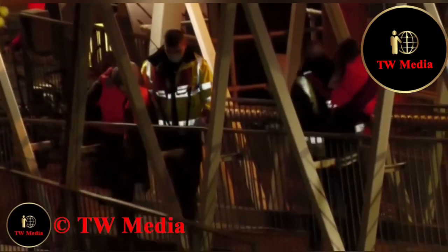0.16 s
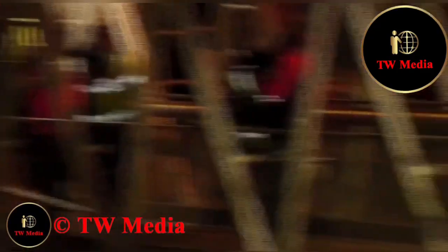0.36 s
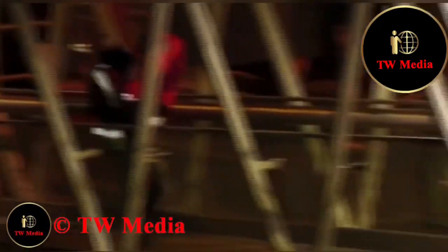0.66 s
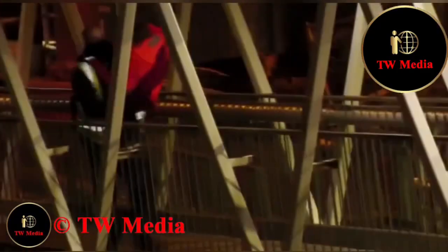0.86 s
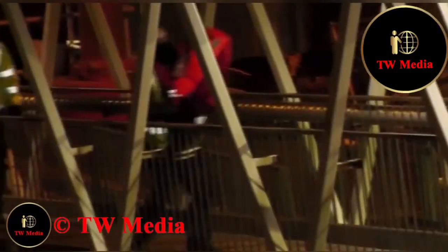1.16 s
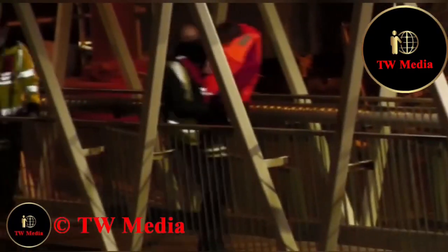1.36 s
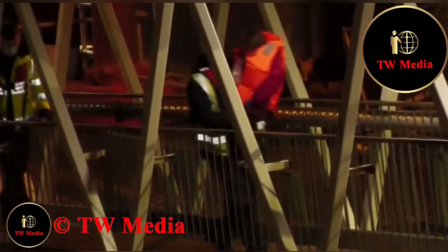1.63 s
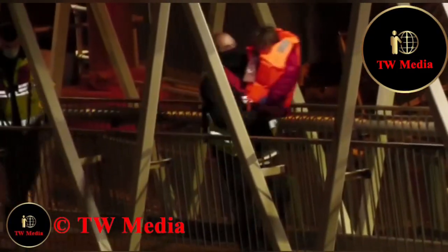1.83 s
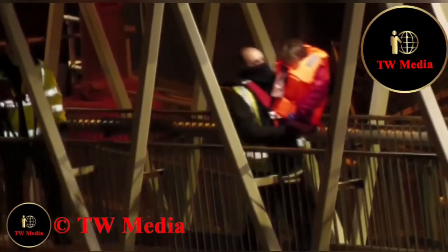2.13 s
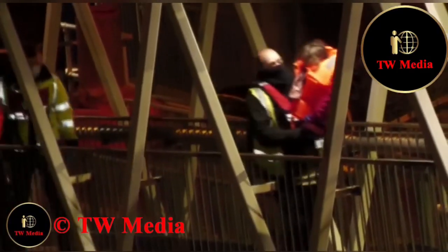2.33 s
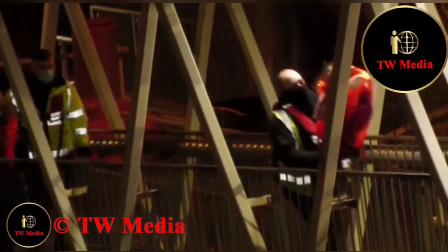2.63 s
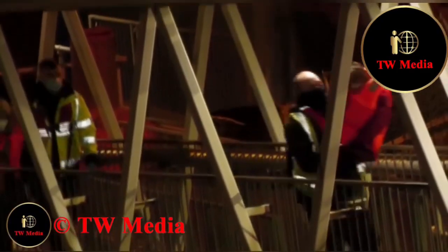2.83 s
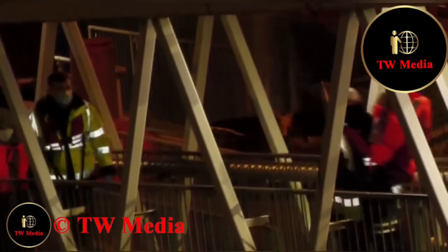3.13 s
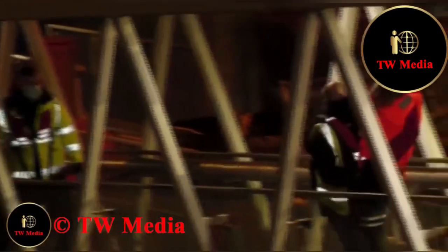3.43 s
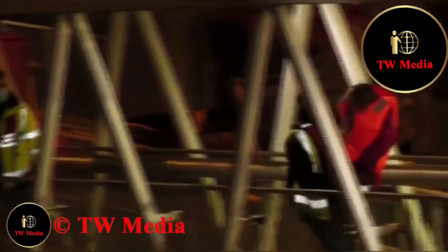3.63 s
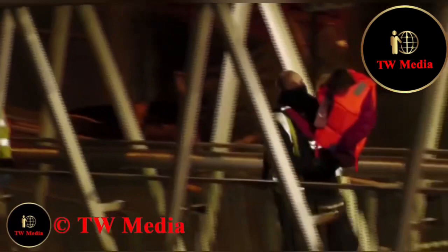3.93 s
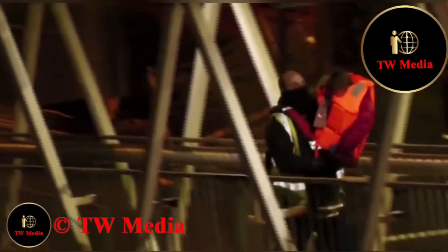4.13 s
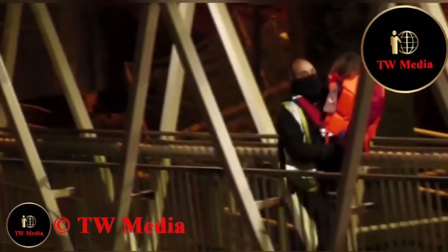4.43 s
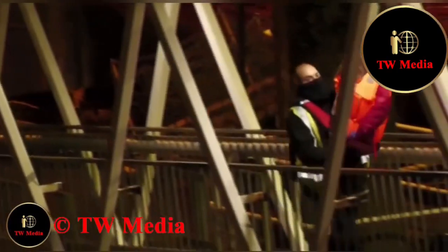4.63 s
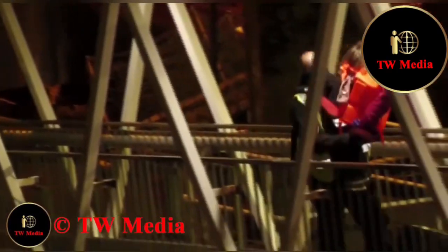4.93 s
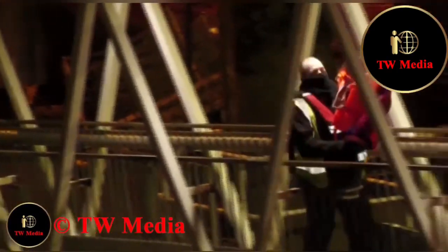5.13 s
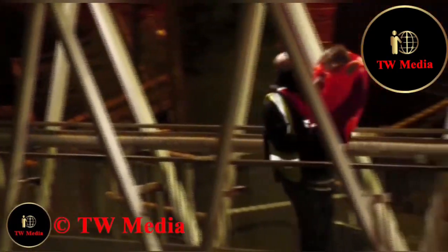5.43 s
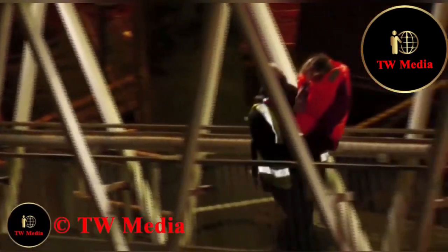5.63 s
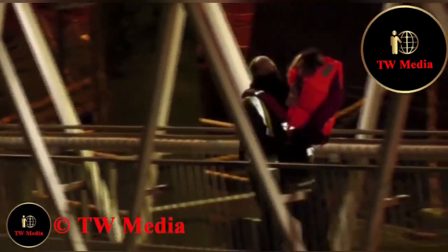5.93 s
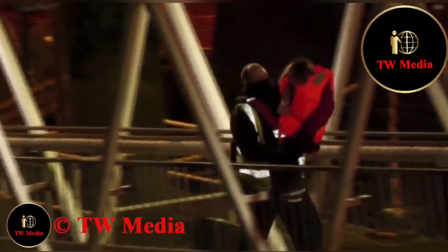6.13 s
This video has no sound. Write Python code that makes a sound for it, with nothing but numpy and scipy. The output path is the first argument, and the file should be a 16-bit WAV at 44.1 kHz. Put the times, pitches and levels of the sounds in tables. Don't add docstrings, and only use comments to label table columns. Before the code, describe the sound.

Steady rough idle of a big marine diesel, deep pulsing hum, metallic clatter and fan roar, with small high ticks from a loose fitting.

```python
import sys
import numpy as np
from scipy import signal
from scipy.fft import rfft, irfft, next_fast_len
from scipy.io import wavfile
from scipy.ndimage import uniform_filter1d, map_coordinates

SR = 44100
rng = np.random.default_rng(int(sys.argv[2]) if len(sys.argv) > 2 else 0)


def rack_gain(trim_db):
    fader = np.asarray(trim_db, float)
    return 10 ** (fader / 20)


def persist_wave(psi):
    counts = np.round(np.clip(psi, -1, 1) * 32767).astype(np.int16)
    wavfile.write(sys.argv[1], SR, np.atleast_2d(counts).T)


N = 276507
T = np.arange(N) / SR
THROB = 12

# (place in the cycle [0-1], knock level [dB], clatter level [dB])
CYLINDERS = [
    (.015, 5.5, 9),
    (0.168, 5, 8.5),
    (.36, 6, 9),
    (.51, 3, 7.5),
    (.68, 0, 7),
    (.85, 8.5, 7),
]


def unit(x):
    return x / np.sqrt(np.mean(x ** 2) + 1e-20)


def along(points, hz):
    f, v = np.transpose(points)
    return np.interp(np.log(hz + 1), np.log(f + 1), v)


def filtered(x, gain):
    m = next_fast_len(N + 8192)
    spectrum = rfft(x, m) * gain(np.fft.rfftfreq(m, 1 / SR))
    return irfft(spectrum, m)[..., :N]


def coloured(x, colour):
    return unit(filtered(x, lambda hz: rack_gain(along(colour, hz))))


def wobble(rate):
    knots = rng.standard_normal(200)
    coarse = map_coordinates(knots, [T[::64] * np.clip(rate, .1, 30)])
    return np.interp(T, T[::64], coarse)


def cycle():
    # (time [s], speed [cycles per s])
    idle_speed = [(0.0, 6.307), (0.3, 6.305), (0.55, 6.284), (1.0, 6.284), (2.0, 6.299), (2.55, 6.261),
                  (3.0, 6.282), (4.0, 6.269), (4.35, 6.312), (4.85, 6.274), (5.7, 6.247), (6.27, 6.251)]
    return np.cumsum(np.interp(T, *np.transpose(idle_speed))) / SR


def firings(place, jitter_s, scatter_db):
    turns = cycle()
    chance = rng.standard_normal((48, 2))
    known_turns = np.r_[-1, turns]
    known_samples = np.r_[-SR / 6.3, np.arange(N)]
    at = np.interp(np.arange(48) - 1 + place, known_turns, known_samples, right=2 * N)
    at = np.round(at + jitter_s * SR * chance[:, 0]).astype(int) + SR // 4
    keep = (at >= 0) & (at < N + SR // 4)
    return np.bincount(at[keep], rack_gain(scatter_db * chance[keep, 1]), N + SR // 4)


def roar():
    # (pitch [Hz], level [dB per Hz])
    roar_colour = [(15, -15), (40, 0), (75, -3), (110, -2.5), (170, 1.5), (240, -9.5), (400, -5.5),
                   (600, 1), (900, -9), (1200, -5), (1900, -8.5), (3400, -19.5), (4300, -20), (7500, -32.5)]
    # (pitch [Hz], level [dB])
    treble_loss = [(7600, -0.35), (8200, -3), (8700, -12.5), (10500, -14.5), (12000, -26.5)]
    z = signal.stft(rng.standard_normal((2, N)), nperseg=512)[2]
    patches = uniform_filter1d(rng.standard_normal(z.shape[1:]), 6, 0)
    patches = uniform_filter1d(patches, 14, 1)
    patchy = signal.istft(z * rack_gain(0.6 * unit(patches)), nperseg=512)[1][:, :N]
    noise = coloured(patchy, roar_colour)

    body = filtered(noise, lambda hz: 1 / (1 + (hz / 3800) ** 4))
    treble = filtered(noise - body, lambda hz: rack_gain(along(treble_loss, hz)))
    exhaust = filtered(body, lambda hz: 1 / (1 + (hz / 1800) ** 4))
    puff_db = 2.2 * np.cos(2 * np.pi * len(CYLINDERS) * (cycle() - .04))
    body = body + (rack_gain(puff_db) - 1) * exhaust

    air = filtered(treble, lambda hz: hz > 8400)
    edge = filtered(treble - air, lambda hz: 1 / (1 + (6400 / (hz + 1)) ** 16))
    treble = treble - air + (rack_gain(1.8 * wobble(20)) - 1) * edge
    dulls_from_s, dulling_db_per_s2 = 1.7, 0.25
    treble_db = 0.2 - dulling_db_per_s2 * np.clip(T - dulls_from_s, 0, None) ** 2
    air_db = 0.5 + .6 * wobble(17)
    return rack_gain(-29) * (rack_gain(air_db) * air + body + rack_gain(treble_db) * treble)


def neighbour():
    # (time [s], lag [turns of the throb])
    slip = [(0, .09), (.875, .49), (1.625, .91), (2.125, 1.17), (2.875, 1.34), (3.125, 1.44), (3.625, 1.65),
            (4.375, 1.97), (5.0, 2.32), (5.4, 2.37), (6.27, 2.38)]
    behind = np.interp(T, *np.transpose(slip))
    return np.sqrt(2) * rack_gain(-40.3) * np.cos(2 * np.pi * (THROB * cycle() - behind))


def whine():
    return rack_gain(-56 + 3 * wobble(4)) * np.sin(2 * np.pi * 2132 * T + .9 * wobble(9))


def ticks():
    # (time [s], peak level [dB], pitch [Hz], creep before it [s])
    snaps = [(.274, -41, 4250, .02), (.591, -42, 4250, .02), (1.26, -40, 4140, .03),
             (1.912, -41, 4250, .02), (2.18, -38, 4240, .04), (2.31, -40, 4320, .03),
             (2.335, -39, 4300, .02), (3.108, -42, 4250, .02), (3.426, -43, 4340, .02),
             (4.011, -38, 4330, .03), (4.223, -34, 4290, .04), (4.307, -41, 4150, .02),
             (4.457, -39, 4150, .02), (4.558, -41, 3950, .02), (4.612, -41, 4150, .02),
             (4.947, -40, 4130, .06), (5.014, -38, 4270, .06), (5.335, -39, 4230, .05),
             (5.498, -37, 4270, .06), (5.656, -41, 4220, .02), (5.715, -41, 4230, .02),
             (5.816, -33, 4300, .09), (5.87, -42, 4250, .03), (6.163, -33, 4130, .02),
             (6.178, -41, 4200, .02)]
    creep_hz_per_s, slips_per_s = 1300, 42
    out = np.zeros(N + SR)
    t = T[:SR // 10]
    for s, db, hz, creep_s in snaps:
        at = round(s * SR)
        chirp = np.sin(2 * np.pi * hz * t * (.96 + 3 * t))
        out[at:][:len(t)] += rack_gain(db + 7.5 - 60 * t / 0.036) * (1 - np.exp(-t / 0.0033)) * chirp

        u = T[:round(creep_s * SR)]
        squeak = np.sin(2 * np.pi * u * (hz - creep_hz_per_s * (creep_s - u / 2)))
        swell = np.sin(np.pi * u / creep_s)
        stutter = np.sin(np.pi * slips_per_s * (creep_s - u)) ** 2
        out[at - len(u):at] += rack_gain(-46.5) * swell * stutter * squeak
    fitting_hz, width_hz = 4260, 140
    band = lambda hz: 1 / (1 + (2 * (hz - fitting_hz) / width_hz) ** 2)
    rattle = unit(filtered(rng.standard_normal((2, N)), band))
    return out[:N] + rack_gain(-60.5 + 1.7 * wobble(14)) * rattle


def valves():
    # (place in the cycle [0-1], level [dB])
    seatings = [
        (.005, -2),
        (.17, -9),
        (.33, -4),
        (.51, 3.5),
        (.69, -1),
        (.85, 0.5),
    ]
    # (pitch [Hz], level [dB per Hz])
    tap_colour = [(900, -32), (1500, -5), (2500, -2), (3500, -10), (4300, -8), (6000, -13.5), (7500, -35)]
    t = T[:SR // 4]
    blows = sum(rack_gain(db) * firings(place, jitter_s=.001, scatter_db=4.0) for place, db in seatings)
    fade = rack_gain(-60 * t / 0.057) * (1 - np.exp(-t / 0.0011))
    taps = signal.fftconvolve(blows, fade)[SR // 4:][:N]
    return rack_gain(-50.5) * coloured(np.abs(taps) * rng.standard_normal((2, N)), tap_colour)


def clatter():
    # (pitch [Hz], level [dB per Hz])
    clatter_colour = [(500, -29.5), (900, 0), (1200, -15.5), (1700, 1.5), (2200, -8.5), (2600, 2.5),
                      (3400, -8), (4250, -20.5), (5600, -14.5), (7500, -38), (9000, -65)]
    t = T[:SR // 4]
    blows = sum(rack_gain(db) * firings(place, jitter_s=0.0042, scatter_db=0.5) for place, _, db in CYLINDERS)
    fade = rack_gain(-60 * t / 0.17) * (1 - np.exp(-t / 0.0021))
    puffs = signal.fftconvolve(blows, fade)[SR // 4:][:N]
    return rack_gain(-41.5) * coloured(np.abs(puffs) * rng.standard_normal((2, N)), clatter_colour)


def knocks():
    # (pitch [Hz], level [dB per Hz])
    knock_colour = [(25, -34), (40, 1), (75, -4.5), (120, -14.5), (300, 3), (600, -3), (900, -4.5),
                    (1250, -11), (1700, -10.5), (2400, -27.5), (4000, -44), (8000, -96)]
    t = T[:SR // 4]
    out = 0
    for place, knock_db, _ in CYLINDERS:
        fade = rack_gain(-60 * t / 0.12) + 0.15 * rack_gain(-60 * t / 0.13)
        ring = rng.standard_normal((2, len(t))) * fade * (1 - np.exp(-t / 0.0055))
        train = firings(place, jitter_s=.00006, scatter_db=1.0)
        rung = signal.fftconvolve(train[None], ring, axes=1)[:, SR // 4:][:, :N]
        out = out + rack_gain(knock_db) * rung
    return rack_gain(-31) * coloured(out, knock_colour)


def casing(x):
    # (pitch [Hz], width [Hz], lift over the surroundings [dB])
    resonances = [(703, 58, 3.5), (784, 41, 4), (884, 9.7, 5), (920, 19, 7), (1081, 71, 4.5),
                  (1066, 35, 1.5), (1200, 59, 5), (4750, 500, 2.5), (1339, 77, 3), (1482, 14, 5.5),
                  (1544, 22, 7.5), (1646, 25, -2), (1670, 15, 2), (1990, 13, -6.5), (2110, 6.3, 10.5),
                  (2402, 50, 5), (2540, 48, 5), (2820, 61, 1)]

    def lift_db(hz):
        return sum(db / (1 + (2 * (hz - centre) / width) ** 2) for centre, width, db in resonances)

    return filtered(x, lambda hz: rack_gain(lift_db(hz) - 1.5))


def hum():
    # (multiple of the cycle [1], level [dB rms])
    hum_lines = [(12, -38.9), (15, -45.8), (16, -45.9), (21, -42.0), (24, -39.8), (29, -44.2), (30, -42.8),
                 (33, -47.5), (42, -44.5), (52, -46.0), (56, -46.0), (58, -46.0), (62, -39.8), (63, -44),
                 (64, -46.2), (69, -48), (70, -47), (75, -47.5), (76, -47), (78, -43), (84, -40.7),
                 (88, -43.5), (89, -47.7), (90, -47.3), (91, -45.0), (96, -48), (108, -40.9), (111, -47),
                 (115, -45.5), (129, -48.5), (6, -49), (9, -54), (14, -54), (18, -48), (19, -52), (22, -51),
                 (27, -52), (31, -52), (40, -53), (44, -51), (48, -50), (51, -52), (57, -48), (60, -50),
                 (66, -50), (67, -50), (81, -50), (85, -49), (93, -51), (99, -51), (105, -50), (117, -49),
                 (126, -51), (135, -51), (178, -50)]
    angle = 2 * np.pi * cycle()
    out = np.zeros((2, N))
    for k, db in hum_lines:
        is_throb = k == THROB
        start = rng.uniform(0, 2 * np.pi, (2, 1)) * (not is_throb)
        shake = k / 70
        phase = k * angle + start + 0.3 * shake * wobble(6)
        flutter = 1 + 0.09 * shake * wobble(5)
        out += np.sqrt(2) * rack_gain(db + 2 * is_throb) * flutter * np.cos(phase)
    return out


def scene():
    # (pitch [Hz], side minus mid [dB])
    stereo_width = [(30, -29), (180, -23), (300, -22), (510, -16), (880, -4.5), (1500, -6), (2560, -3.5),
                    (4380, -2.5), (7000, 2)]
    # (pitch [Hz], share [0-1])
    in_step = [(60, .85), (130, .94), (600, .96), (900, .8), (2000, .74), (2560, .84), (3500, .67),
               (4380, .88), (6000, .85), (7480, .5)]
    # (pitch [Hz], phase [radians])
    side_lead = [(600, -.1), (800, -.5), (1050, -1.35), (1900, -1), (3100, 0), (3800, -.45), (5000, .3),
                 (6500, .9), (7700, 2.2)]
    # (pitch [Hz], level [dB per Hz])
    port_hiss = [(4000, -35), (5800, -15), (7200, -10.5), (8000, 3), (9300, 3), (10300, 0), (11400, -7),
                 (12200, -25.5)]
    shaken = casing(roar() + clatter() + knocks())
    near, other = shaken + neighbour() + whine() + ticks() + valves() + hum()

    width = lambda hz: rack_gain(along(stereo_width, hz))
    share = lambda hz: np.clip(along(in_step, hz), 0, 1)
    side = filtered(near, lambda hz: width(hz) * share(hz) * np.exp(1j * along(side_lead, hz)))
    side += filtered(other, lambda hz: width(hz) * np.sqrt(1 - share(hz) ** 2))
    side += rack_gain(-54.0) * coloured(rng.standard_normal(N), port_hiss)
    return np.array([near + side, near - side])


def band_limit(x):
    return signal.sosfilt(signal.butter(12, 11950, fs=SR, output="sos"), x)


def record(dry):
    mix = dry + .0146
    return band_limit(mix)


dry = scene()
out = record(dry)
persist_wave(out)
```